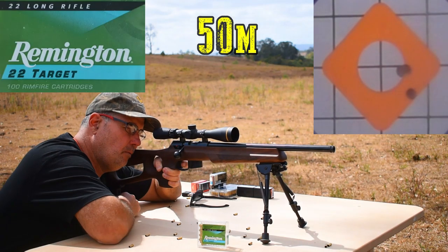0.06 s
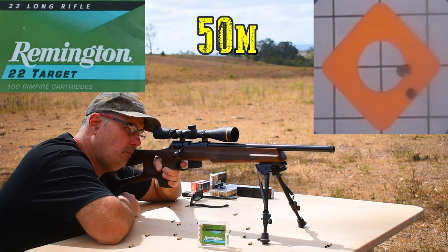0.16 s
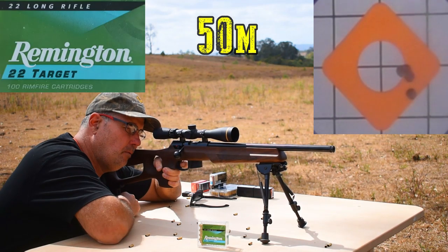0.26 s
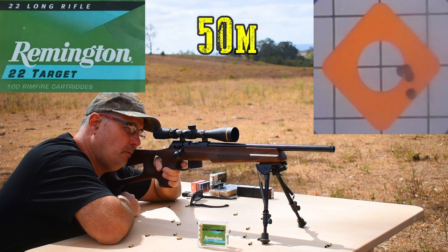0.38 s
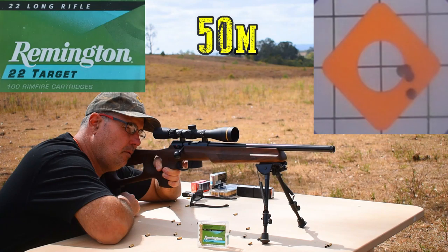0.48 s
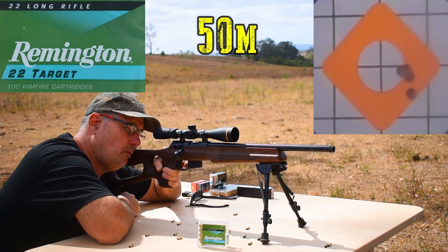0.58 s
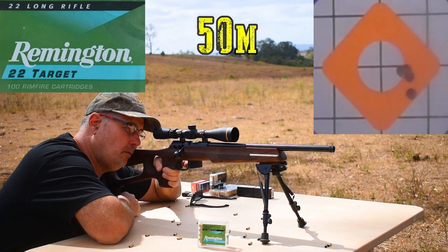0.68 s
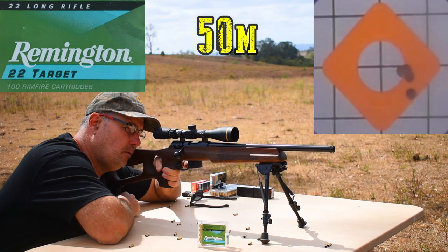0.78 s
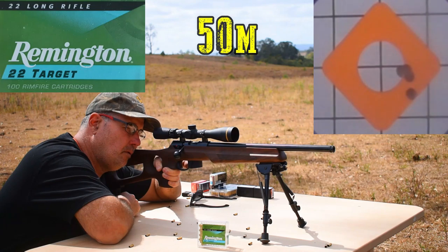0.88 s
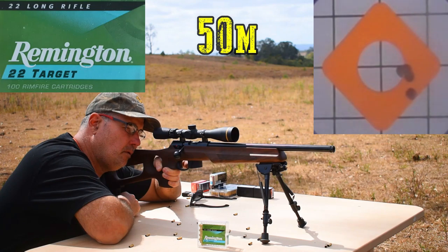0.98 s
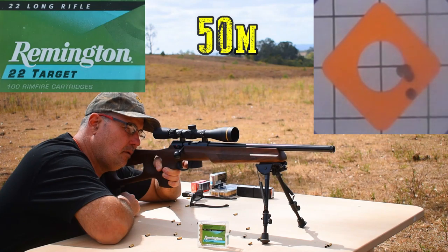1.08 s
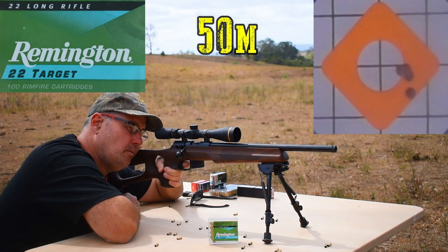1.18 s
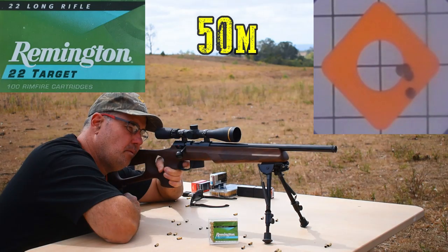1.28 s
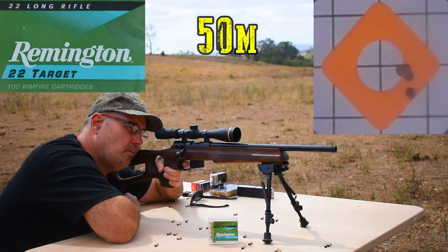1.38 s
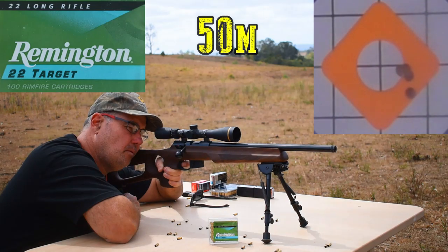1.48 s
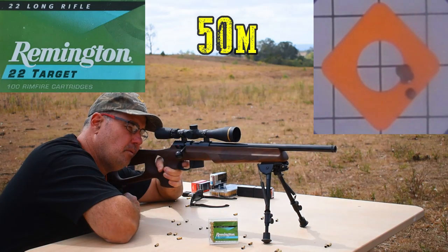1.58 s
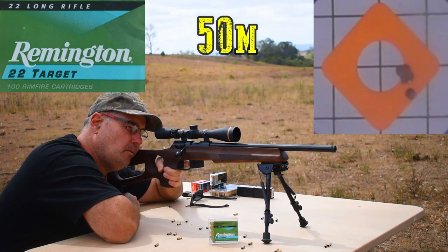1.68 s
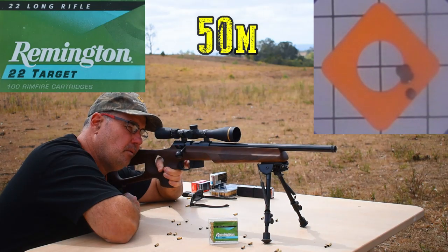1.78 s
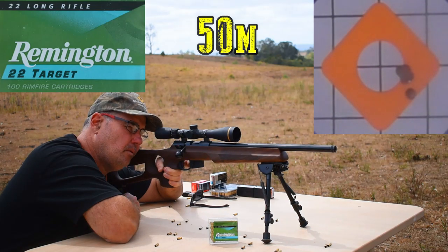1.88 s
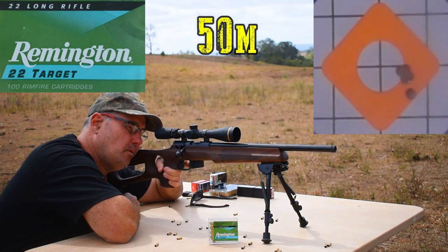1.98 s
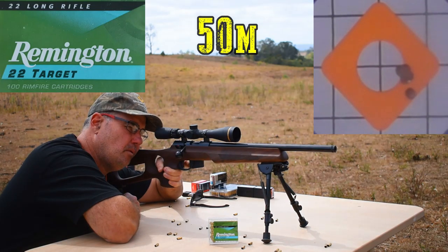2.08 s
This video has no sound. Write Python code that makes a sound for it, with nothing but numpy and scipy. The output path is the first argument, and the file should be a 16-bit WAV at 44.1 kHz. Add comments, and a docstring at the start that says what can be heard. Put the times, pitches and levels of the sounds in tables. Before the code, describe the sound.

Small-calibre rifle fires twice, close and dry, cracks scattering quickly off ground and distant trees

```python
"""An open field, two shots of a small rifle close to the microphone, over faint outdoor noise.
Each crack is a swelling noise burst that overloads the microphone: a slowing swing that builds, then dies
away (the thump), and a deaf moment before the scattered report is heard. Ground and trees scatter it as
filtered random grains over a rumble; hard surfaces add slaps of a few cycles, with low thuds and thin
treble ticks."""
import sys
import numpy as np
from scipy import signal
from scipy.fft import rfft, irfft
from scipy.io import wavfile
from scipy.ndimage import uniform_filter1d

SR = 44100
rng = np.random.default_rng(int(sys.argv[2]) if len(sys.argv) > 2 else 0)


def wav_record(signal):
    """Record a signal, one row per channel, as 16-bit PCM in the file named by sys.argv[1]."""
    frames = np.transpose(np.atleast_2d(signal))
    bounded = np.clip(frames, -1, 1)
    # unit amplitude maps onto the largest positive 16-bit level
    quanta = np.round(bounded * 32767).astype(np.int16)
    wavfile.write(sys.argv[1], SR, quanta)


N = 92610

# Outdoor noise spectrum. Each row: frequency in Hz, relative level in dB per Hz.
AIR_SPECTRUM = [(15, -41), (40, -16.5), (70, -1), (130, -1), (300, -7), (700, -13.5), (2000, -23.5),
                (5000, -33), (9000, -41.5), (16300, -50.5)]
# Thin bright ticks among the returns. Each row: start in s, level in dB, lowest Hz, top Hz.
TICK_ROWS = [(.343, -22, 3000, 6000), (0.381, -27.5, 4000, 10800), (0.611, -50.5, 3000, 9050),
             (.617, -45, 3500, 7500), (1.014, -51, 3580, 5000), (1.604, -20, 3000, 5830),
             (1.6395, -27, 3500, 15000), (1.84, -43, 3500, 6500), (1.914, -37.5, 1500, 5300)]
# Low thuds under the strongest returns. Each row: start in s, peak in dB, pitch in Hz.
THUD_ROWS = [(.343, -16.5, 394), (.376, -21, 427), (.392, -27.5, 443), (1.604, -18.5, 390),
             (1.637, -23.5, 448)]
# Single slaps off hard surfaces. Each row: start in s, peak in dB, pitch in Hz, decay in cycles.
SLAP_ROWS = [(0.3424, -10.5, 1640, 3), (0.3458, -11.5, 1397, 7.4), (0.369, -23, 1830, 2),
             (0.3753, -4.5, 1260, 1.2), (.392, -18.5, 1330, 1.9), (.451, -17.5, 1440, 2.1),
             (.47, -28, 1280, 1.5), (0.487, -30, 1830, 1.8), (0.61, -15.5, 1330, 2.05),
             (.705, -48.5, 1720, 2.1), (.719, -26.5, 1450, 2.5), (.896, -39.5, 1900, 2.2),
             (.953, -38, 1990, 1.4), (1.016, -35.5, 1770, 1.8), (1.046, -40, 1390, 1.8),
             (1.06, -38, 1570, 2.1), (1.078, -40, 1794, 1.5), (1.603, -8.5, 1460, 4.5),
             (1.608, -11.5, 1420, 2.1), (1.634, -15, 1800, 2.6), (1.6368, -6, 1220, 1.3),
             (1.653, -8, 1650, 1.9), (1.7128, -21, 1380, 3.5), (1.734, -27, 890, 1.8),
             (1.757, -28.5, 1510, 2.5), (1.872, -24.5, 1230, 2.3), (1.968, -45, 1490, 1.3),
             (1.979, -21, 1370, 3.3)]
# Scattered report. Each row: delay in s, level in dB, treble in dB above the usual colour,
# rumble level in dB, pitch of the main hump in Hz.
SCATTER_ROWS = [(.025, -30.5, 4.5, -35.5, 1500), (.048, -38.5, 1.5, -47.5, 1500),
                (.056, -34.5, 10.5, -35, 1900), (.075, -27.5, 4.5, -43, 2104),
                (.088, -27.5, -1, -44.5, 1900), (.1, -27.5, 2, -34, 1640), (.113, -20.5, -10, -37.5, 1494),
                (.125, -28, -5, -34.5, 1500), (.136, -22.5, -0.5, -35.5, 1500), (.149, -29.5, 4, -39, 1400),
                (.158, -24.5, -7, -39.5, 1470), (.17, -30.5, -4, -40.5, 1450), (.19, -38.5, 0.5, -48, 1500),
                (.23, -35.5, -8, -55, 1400), (.275, -41.5, -8.5, -48.5, 1500),
                (0.302, -49, -5.5, -54, 1520), (0.333, -58, -1, -56, 1660), (.346, -47, 7, -54, 1750),
                (.365, -44, -2.5, -67, 1700), (0.383, -41, -6, -48.5, 1570), (0.406, -52, -11.5, -56, 1370),
                (.44, -56.5, 0, -60, 1530), (0.457, -48.5, 5, -63, 1540), (0.481, -43, -3.5, -54.5, 1480),
                (0.511, -53, -1, -55.5, 1500), (0.528, -58, -2.5, -59, 1500),
                (0.587, -61, -7.5, -61.5, 2000), (.605, -50.5, -15.5, -65, 2320),
                (.635, -55, -4, -62, 2000), (.65, -57, -10, -58, 1820), (0.702, -59.5, -16.5, -62, 1980),
                (0.763, -61.5, -4, -61.5, 1970), (.785, -58, -5, -76, 1650), (.83, -53, -11, -62, 1470),
                (.88, -56.5, -15, -64.5, 1700), (.9, -58.5, -15, -75, 1630), (.915, -51.5, -3, -78, 1670),
                (.922, -87, -12, -81, 1600)]
# Colour of the near ground. Each row: frequency in Hz, relative level in dB per Hz.
NEAR_SPECTRUM = [(150, -21), (420, -4.5), (560, -13), (750, -1), (1000, -5), (1500, 1), (2300, -5),
                 (3600, -16), (5200, -15), (7500, -25.5), (11000, -37.5), (16000, -52)]
# Colour of far trees, combed by the ground. Each row: frequency in Hz, relative level in dB per Hz.
FAR_SPECTRUM = [(150, -8.5), (400, -1), (700, -4.5), (1000, -9), (1500, 5.5), (2100, -2.5), (2900, -15),
                (3500, -16), (4300, -5.5), (5300, -24.5), (6400, -19.5), (7600, -48.5), (16000, -81)]
# Rumble spectrum. Each row: frequency in Hz, relative level in dB per Hz.
RUMBLE_SPECTRUM = [(15, -26.5), (30, -12), (60, -1), (110, -2.5), (200, -6), (400, -12), (900, -57.5)]
# Microphone overload, one row per shot: thump peak in dB, thump fade in s, deaf time in s,
# waking bump in dB, bump length in s.
OVERLOAD_ROWS = [(-4., .02, .0255, -24, .009), (-7.5, .024, .029, -16.5, .006)]
# Crack spectrum. Each row: frequency in Hz, relative level in dB per Hz.
CRACK_SPECTRUM = [(200, 2), (500, 1.5), (900, -1.5), (1500, 0.5), (2500, -7.5), (4000, -5.5), (6000, -13),
                  (8500, -20.5), (12000, -26), (16000, -39)]
# Shots. Each row: end of the crack in s, crack level in dB, gain of the scatter in dB.
SHOT_ROWS = [(0.2373, -16, 4), (1.4986, -17, 3)]

AIR_RMS_DB = -58
TICK_PEAK_S = .0008
THUD_CYCLES = 3.43
SLAP_RISE_CYCLES, SLAP_SMEAR_DB, SLAP_SMEAR_RATIO = .9, -9, 1.5
GRAINS_PER_S, GRAIN_SPREAD_DB, PATCHY_DB = 6000, 2.5, 2
NEAR_UNTIL_S, FAR_FROM_S = 0.23, 0.54
TREBLE_HZ, HUMP_HZ = 3560, 1500
WAKE_S, WOBBLE_DB, WOBBLE_S = .0015, -25, .028
FIRST_SWING_S, SWING_STRETCH, THUMP_RISE_S, FADE_POWER = .0046, 1.9, .006, 2.7
RATTLE_DB, RATTLE_HZ = -33.5, 1200
CRACK_S, CRACK_RISE_DB, CRACK_HOLD_S, CRACK_FALL_S = .0085, 18, .003, .00025
BAND_LIMIT_HZ = 16300


def amp(db):
    """Decibels to a linear factor."""
    return 10 ** (np.asarray(db) / 20)


def evened(x):
    """Scale to rms 1."""
    return x / np.sqrt(np.mean(x ** 2) + 1e-20)


def read(points, hz):
    """Interpolate a spectrum table along log frequency."""
    f, value = np.transpose(points)
    return np.interp(np.log(hz + 1), np.log(f + 1), value)


def add(mix, start_s, sound):
    """Add a sound in place, cut at the end of the mix."""
    part = mix[round(start_s * SR):][:len(sound)]
    part += sound[:len(part)]


def coloured(points, count):
    """Noise with the given spectrum, rms 1."""
    hz = np.fft.rfftfreq(count, 1 / SR)
    spectrum = rfft(rng.standard_normal(count)) * amp(read(points, hz))
    return evened(irfft(spectrum, count))


def band(low_hz, top_hz, count):
    """Noise between two steep edges, rms 1."""
    edges = signal.butter(3, [low_hz, min(top_hz, SR / 3)], "band", fs=SR, output="sos")
    noise = signal.sosfilt(edges, rng.standard_normal(2 * count))
    return evened(noise[count:])  # filter settled


def air():
    """Faint outdoor floor: steady coloured noise."""
    return amp(AIR_RMS_DB) * coloured(AIR_SPECTRUM, count=N)


def tick(start_s, level_db, low_hz, top_hz):
    """A very short puff of treble: band noise under a quick rise and fall."""
    u = np.arange(600) / SR / TICK_PEAK_S
    envelope = u ** 2 * np.exp(2 - 2 * u) / 2  # tops out at 0.5
    return start_s, amp(level_db) * band(low_hz, top_hz, count=len(u)) * envelope


def thud(start_s, peak_db, hz):
    """A few soft low cycles: a sine under a smooth arch."""
    cycles = np.arange(0, THUD_CYCLES, hz / SR)
    arch = np.sin(np.pi * cycles / THUD_CYCLES) ** 2
    return start_s, amp(peak_db) * np.sin(2 * np.pi * cycles) * arch


def slap(start_s, peak_db, hz, decay_cycles):
    """One hard surface returns the report: a few cycles, smeared by its edges."""
    cycles = np.arange(1200) / SR * hz
    smear = band(hz / SLAP_SMEAR_RATIO, hz * SLAP_SMEAR_RATIO, count=len(cycles))
    tone = np.sin(2 * np.pi * (cycles + rng.random())) + amp(SLAP_SMEAR_DB) * smear
    rise = 1 - np.exp(-(cycles / SLAP_RISE_CYCLES) ** 2)
    body = rise * np.exp(-cycles / decay_cycles) * tone
    return start_s, amp(peak_db) * body / abs(body).max()


def reflection_grains(count):
    """Countless small reflections: sparse random impulses of either sign and uneven level, rms 1."""
    signs = rng.choice([-1., 1.], count)
    present = rng.random(count) < GRAINS_PER_S / SR
    level_db = GRAIN_SPREAD_DB * np.minimum(rng.exponential(1, count), 4)
    return evened(signs * present * amp(level_db))


def path_colour_db(hz, t):
    """Colour of the returns, sliding from near ground to far trees as their path lengthens."""
    delay_s, _, treble_db, _, hump_hz = np.transpose(SCATTER_ROWS)
    hz = hz[:, None]
    far = np.clip((t - NEAR_UNTIL_S) / (FAR_FROM_S - NEAR_UNTIL_S), 0, 1)
    high = 1 / (1 + (TREBLE_HZ / (hz + 1)) ** 6)  # 0 below the treble, 1 in it
    slide = HUMP_HZ / np.interp(t, delay_s, hump_hz)
    slid_hz = hz * (high + (1 - high) * slide)  # the treble stays put
    colour_db = read(NEAR_SPECTRUM, slid_hz) * (1 - far) + read(FAR_SPECTRUM, slid_hz) * far
    power = (amp(colour_db) ** 2).mean(0)
    return colour_db - 10 * np.log10(power) + high * np.interp(t, delay_s, treble_db)


def scatter(end_s, deaf_s, gain_db):
    """Scattered report: recoloured, patchy grains over a rumble, silent while the microphone is deaf."""
    delay_s, wash_db, _, rumble_db, _ = np.transpose(SCATTER_ROWS)
    count = SR  # one second
    hz, frame_s, z = signal.stft(reflection_grains(count), SR, nperseg=256, noverlap=192)
    patches = uniform_filter1d(rng.standard_normal(z.shape), size=4, axis=0)
    patches = evened(uniform_filter1d(patches, size=7, axis=1))
    z = z * amp(path_colour_db(hz, frame_s) + PATCHY_DB * patches)
    wash = signal.istft(z, SR, nperseg=256, noverlap=192)[1][:count]
    t = np.arange(count) / SR
    rumble = coloured(RUMBLE_SPECTRUM, count) * amp(np.interp(t, delay_s, rumble_db))
    both = wash * amp(np.interp(t, delay_s, wash_db)) + rumble
    wake = np.clip((t - deaf_s) / WAKE_S, 0, 1)
    fade_out = np.clip((1 - t) * 20, 0, 1)  # last 50 ms
    return end_s, amp(gain_db) * both * wake * fade_out


def waking(wake_s, bump_db, bump_s):
    """A soft bump and one slow wobble as the microphone wakes."""
    t = np.arange(0, WOBBLE_S, 1 / SR)
    bump = np.sin(np.pi * np.minimum(t / bump_s, 1)) ** 2
    wobble = -np.sin(2 * np.pi * t / WOBBLE_S) * np.sin(np.pi * t / WOBBLE_S)
    return wake_s - WAKE_S / 2, amp(bump_db) * bump + amp(WOBBLE_DB) * wobble


def thump(end_s, peak_db, fade_s):
    """The overloaded microphone swings ever more slowly, hardest on the second swing, then fades; some grit."""
    t = np.arange(1, SR // 8) / SR
    turn = np.pi * np.log(t / FIRST_SWING_S) / np.log(SWING_STRETCH)  # log time slows the swings
    shape = (1 - np.exp(-(t / THUMP_RISE_S) ** 2)) / (1 + (t / fade_s) ** FADE_POWER)
    swing = np.cos(np.maximum(turn, -np.pi / 2)) * shape
    low_pass = signal.butter(2, RATTLE_HZ, fs=SR)
    grit = evened(signal.lfilter(*low_pass, rng.standard_normal(len(t))))
    both = swing / abs(swing).max() + amp(RATTLE_DB) * grit * shape
    return end_s - FIRST_SWING_S, amp(peak_db) * both


def crack(end_s, level_db):
    """A burst of noise that swells and holds until the microphone gives out."""
    t = np.arange(-CRACK_S, .01, 1 / SR)
    swell_db = CRACK_RISE_DB * np.minimum(t + CRACK_HOLD_S, 0) / (CRACK_S - CRACK_HOLD_S)
    fall = np.exp(-np.maximum(t + 2 * CRACK_FALL_S, 0) / CRACK_FALL_S)
    noise = coloured(CRACK_SPECTRUM, count=4096)[:len(t)]
    return end_s - CRACK_S, amp(level_db) * amp(swell_db) * fall * noise


def scene():
    """The open air, the returns and the shots."""
    mix = air()
    for row in TICK_ROWS:
        add(mix, *tick(*row))
    for row in THUD_ROWS:
        add(mix, *thud(*row))
    for row in SLAP_ROWS:
        add(mix, *slap(*row))
    for shot, overload in zip(SHOT_ROWS, OVERLOAD_ROWS):
        end_s, crack_db, scatter_db = shot
        thump_db, fade_s, deaf_s, bump_db, bump_s = overload
        add(mix, *scatter(end_s, deaf_s, scatter_db))
        add(mix, *waking(end_s + deaf_s, bump_db, bump_s))
        add(mix, *thump(end_s, thump_db, fade_s))
        add(mix, *crack(end_s, crack_db))
    return mix[None]


def record(dry):
    """Band limit: a steep low-pass."""
    low_pass = signal.firwin(511, BAND_LIMIT_HZ, window=("kaiser", 9), fs=SR)
    return signal.oaconvolve(dry, low_pass[None], "same")


dry = scene()
out = record(dry)
wav_record(out)
```